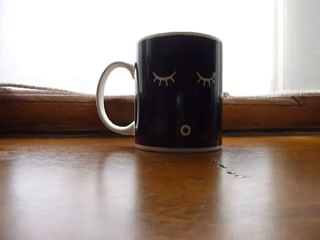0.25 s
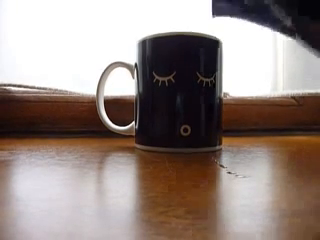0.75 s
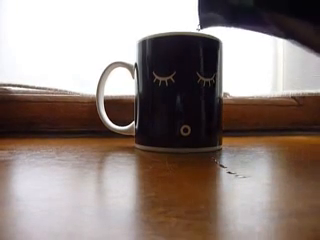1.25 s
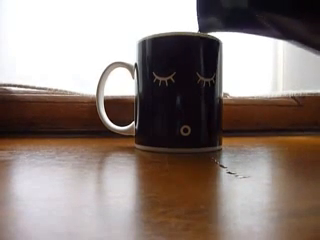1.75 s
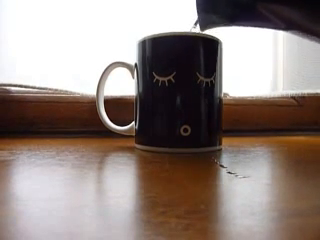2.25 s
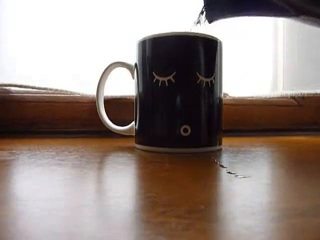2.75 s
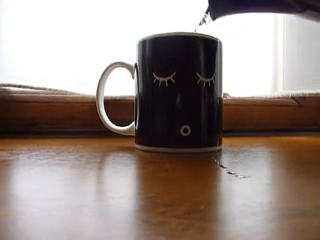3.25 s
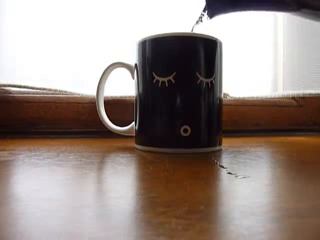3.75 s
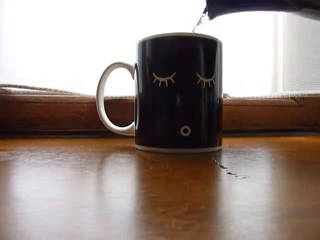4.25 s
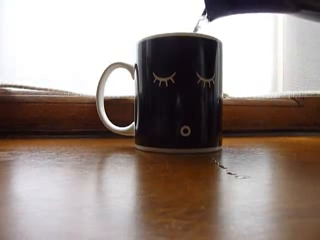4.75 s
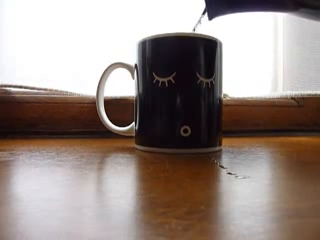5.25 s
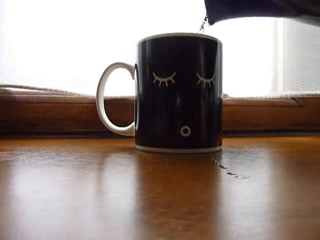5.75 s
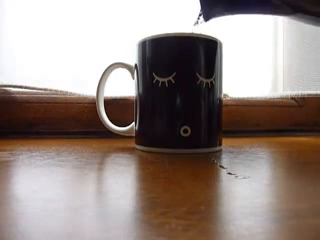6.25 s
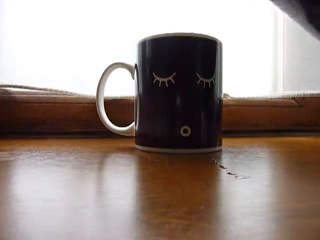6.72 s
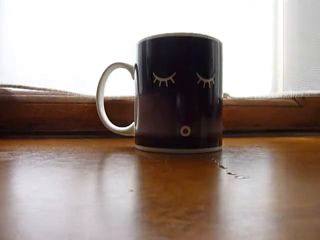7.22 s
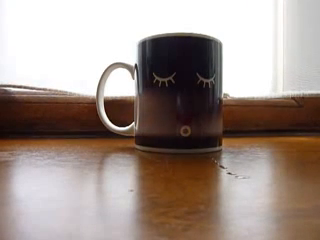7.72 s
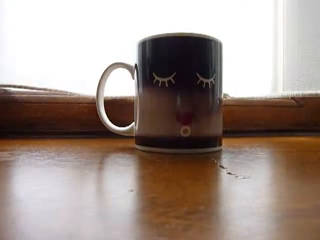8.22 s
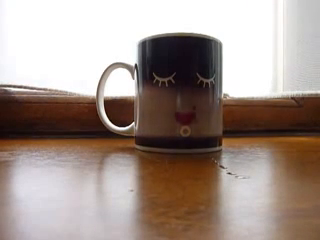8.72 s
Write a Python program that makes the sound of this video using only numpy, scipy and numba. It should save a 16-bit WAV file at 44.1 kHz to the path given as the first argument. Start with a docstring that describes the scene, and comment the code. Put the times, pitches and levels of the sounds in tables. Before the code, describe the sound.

A knock on a wooden table, then water trickles and gurgles into a mug, followed by two thumps of a kettle being set down.

```python
"""In a quiet room a knock rings the modes of a wooden table. A thin stream of hot water then falls from
a kettle into a ceramic mug: drops smack the bottom, then trap ringing bubbles, and the stream gurgles as
the shortening air column rises in pitch. The pour dies away among ticks of the hot kettle and last drips.
Finally the kettle is set down on the table, bounces, slides and thumps again."""
import sys
import numpy as np
from scipy import signal
from scipy.fft import rfft, irfft, next_fast_len
from scipy.io import wavfile
from scipy.ndimage import uniform_filter1d, map_coordinates
from numba import njit

SR = 44100
rng = np.random.default_rng(int(sys.argv[2]) if len(sys.argv) > 2 else 0)


def bounce(signal):
    """Save signal as a 16-bit WAV file at the path given by the first command-line argument."""
    frames = np.transpose(np.atleast_2d(signal))
    limited = np.clip(frames, -1, 1)
    pcm = np.round(limited * 32767).astype(np.int16)
    wavfile.write(sys.argv[1], SR, pcm)


N = 396018
TIME = np.arange(N) / SR

# Room murmur and hiss: f/Hz, relative spectral level/dB
ROOM_SPECTRUM = [(12, -50.5), (20, -7.5), (44, -8.5), (86, -9.5), (123, 0.5), (146, -4.5), (454, -4.5),
                 (583, -6), (714, -3), (1720, -10), (7050, -18), (8200, -24), (10700, -58), (18000, -120)]
# Ticks of the hot kettle and last drips: t/s, level/dB, centre f/Hz
TICK_EVENTS = [(2.172, -46.5, 344), (4.68, -55.5, 398), (4.9, -49.5, 2180), (5.057, -45, 2240),
               (5.13, -51.5, 2370), (5.152, -44.5, 1880), (5.655, -40, 2100), (6.207, -49.5, 2480),
               (6.57, -49.5, 1960), (6.852, -49, 4370), (6.942, -42.5, 6140), (7.459, -42.5, 2520),
               (8.301, -40.5, 3170)]
# Blows on the table: t/s, level/dB, contact time/ms
TABLE_BLOWS = [(0.829, -61, 0.2), (0.9929, -12.5, 0.34), (1.622, -59, 0.29), (7.765, -13.5, 0.15),
               (7.7681, -13.5, 0.32), (7.831, -23, 0.22), (7.841, -34, 0.089), (7.886, -28.5, 0.3),
               (7.893, -35.5, .13), (7.91, -28.5, 0.6), (8.252, -47.5, 0.32), (8.288, -47.5, 0.23),
               (8.398, -39, 0.53), (8.409, -23.5, 0.32), (8.42, -21.5, 0.24), (8.425, -23, 0.38),
               (8.435, -24, 0.28)]
# Modes of the table top: f/Hz, level/dB, t60/s
WOOD_MODES = [(122.8, -11, .16), (175.7, -6, 0.2), (226.4, -6, 0.16), (319.1, 2, 0.041), (415, -1.5, 0.1),
              (466.2, -3.5, 0.13), (530, -12.5, .12), (597, -9, 0.12), (738.8, -12, .13), (870, -17, 0.16),
              (1080, -12.5, 0.073), (1290, -4, 0.044), (1400, -11, 0.08)]
# Dense upper modes of table and room: f/Hz, unstretched t60/s
DIFFUSE_DECAY = [(300, 0.27), (1000, 0.11), (3000, 0.15), (8000, 0.048)]
# Kettle rubbing on wood: f/Hz, relative spectral level/dB
FRICTION_SPECTRUM = [(71, -49), (120, -5.5), (335, -12), (438, -7), (658, -12), (2440, -26), (8300, -48.5),
                     (10800, -66), (18300, -120)]
# Slides of the kettle: t/s, level/dB, rise/s, hold/s, fall/(dB/s)
KETTLE_SLIDES = [(7.904, -50.5, .02, .03, 131), (7.971, -48, 0.034, 0.081, 125),
                 (8.386, -26.5, 0.039, 0.0024, 380), (8.484, -53.5, 0.014, 0.026, 204)]
# Drops that smack the mug: t/s, level/dB, centre f/Hz
DROP_SMACKS = [(1.925, -36.5, 5350), (1.9336, -39.5, 5230), (1.98, -44, 6760), (2.0005, -42, 7070),
               (2.173, -36, 4770), (2.397, -37.5, 6160), (2.4899, -40.5, 3500), (2.371, -48, 7030),
               (2.5004, -46, 5350), (2.5503, -36.5, 6400), (2.6645, -40.5, 7010), (2.8, -39, 6500),
               (3.11, -45.5, 7100), (3.23, -36, 3500), (3.2375, -40, 3420), (3.286, -42, 3200),
               (3.4109, -31.5, 2940), (3.929, -41, 3250), (4.0126, -44.5, 3900), (4.215, -49.5, 6430),
               (4.278, -46.5, 6500)]
# Drops that ring the wall, lower when the mug is full: t/s, level/dB, f/Hz
WALL_PINGS = [(3.287, -55, 2611), (3.414, -48, 2611), (7.018, -61, 2000)]
# Modes of the mug wall: frequency ratio, level/dB, t60/s
WALL_MODES = [(1, 0, .25), (1.011, -9, .1), (1.264, 6, .03)]
# Drops that trap a bubble: t/s, level/dB, f/Hz
BUBBLE_DROPS = [(2.861, -48.5, 1460), (2.932, -42, 1050), (3.025, -40.5, 1055), (3.13, -40, 1050),
                (3.23, -38.5, 1100), (3.246, -33, 1094), (3.255, -36, 1070), (3.279, -24, 1129),
                (3.303, -36, 1080), (3.36, -29.5, 1104), (3.4, -24, 1148), (3.411, -28, 1127),
                (3.459, -39, 1130), (3.495, -35.5, 1060), (3.576, -42, 1180), (3.653, -39.5, 1150),
                (3.705, -39.5, 1073), (3.723, -40.5, 1220), (3.769, -43, 1270), (3.795, -41, 1040),
                (3.828, -37.5, 1330), (3.912, -41.5, 1405), (3.929, -40, 1190), (3.946, -40.5, 1213),
                (4.219, -47, 1355), (4.745, -46.5, 1346), (4.919, -49.5, 1410), (7.018, -27.5, 1196)]
# Fine mist: t/s, level/dB
MIST_LEVEL = [(2.3, -78.5), (2.6, -67.5), (3.25, -65.5), (3.6, -71.5), (3.95, -82), (4.03, -66.5),
              (4.34, -82.5), (5.3, -79)]
# Squirts through an air pocket: t/s, level/dB, hold/s, lowest f/Hz
POCKET_SQUIRTS = [(2.66, -58.5, 0.015, 2580), (2.83, -64, 0.15, 2890), (2.99, -53.5, 0.1, 1675),
                  (3.23, -56.5, 0.035, 2410), (4.006, -60.5, 0.053, 2640)]
# Strength of the stream: t/s, level/dB
STREAM_LEVEL = [(2.3, -75), (2.9, -65), (3.05, -60), (3.21, -65), (3.25, -50), (3.385, -56), (3.42, -54.5),
                (3.56, -57), (3.62, -69), (3.7, -60), (3.96, -55.5), (4.02, -67), (4.34, -72), (4.62, -79),
                (4.75, -66.5), (4.83, -81), (4.93, -65), (5.2, -88)]
# Air column of the filling mug: t/s, f/Hz
COLUMN_PITCH = [(1.5, 805), (2.9, 1033), (3.6, 1112), (3.9, 1288), (4.3, 1480), (5.4, 1450)]


def amp(db):
    """Amplitude ratio of a level in dB."""
    return 10 ** (np.asarray(db) / 20)


def unit(x):
    """x scaled to rms 1."""
    return x / np.sqrt(np.mean(x ** 2) + 1e-20)


def along(points, hz):
    """Interpolation of (f, value) points on a log frequency axis."""
    f, values = np.transpose(points)
    return np.interp(np.log(hz + 1), np.log(f + 1), values)


def envelope(rows):
    """Gain through (t, level) points, silent outside their span."""
    times, db = np.transpose(rows)
    edge = np.clip(np.minimum(TIME - times[0], times[-1] - TIME) / 0.011, 0, 1)
    return edge * amp(np.interp(TIME, times, db))


def swell(start, db, rise_s, hold_s, fall_db_per_s):
    """Gain with a quadratic rise, a hold and an exponential decay."""
    t = TIME - start
    return np.clip(t / rise_s, 0, 1) ** 2 * amp(db - fall_db_per_s * np.maximum(t - rise_s - hold_s, 0))


def wobble(knots_per_s):
    """A smooth curve through random knots."""
    knots = rng.standard_normal(int(N * knots_per_s / SR) + 4)
    return map_coordinates(knots, [TIME * knots_per_s])


def add(track, start, sound):
    """Superpose a sound on the track at a time in seconds."""
    part = track[round(start * SR):][:len(sound)]
    part += sound[:len(part)]


def filtered(x, response):
    """Linear filtering: the spectrum of x times a frequency response."""
    size = next_fast_len(len(x) + SR // 2)
    return irfft(rfft(x, size) * response(np.fft.rfftfreq(size, 1 / SR)), size)[:len(x)]


def resonance(hz, width_hz):
    """Frequency response of a damped oscillator."""
    return lambda f: 1j * f * width_hz / (hz * hz - f * f + 1j * f * width_hz)


@njit
def gliding(x, hz, radius):
    """A two-pole resonator with time-varying pitch and damping."""
    y = np.zeros(len(x))
    for i in range(2, len(x)):
        feedback = 2 * radius[i] * np.cos(2 * np.pi * hz[i] / SR) * y[i - 1] - radius[i] ** 2 * y[i - 2]
        y[i] = (1 - radius[i]) * (x[i] - x[i - 2]) + feedback
    return y


def cavity(x, hz, t60_at_1khz, stages=1):
    """Cavity resonance with radiation damping: a shorter cavity loses its energy faster."""
    radius = amp(-60 * (hz / 1000) ** 2 / t60_at_1khz / SR)
    for _ in range(stages):
        x = gliding(x, hz, radius)
    return x


def ring(modes, t, scatter_db):
    """Free vibration: damped modes of randomly scattered strength, neighbours in opposite phase."""
    out = np.zeros(len(t))
    for k, (hz, db, t60) in enumerate(modes):
        decay = amp(db + scatter_db * rng.standard_normal() - 60 * t / t60)
        out += (-1) ** k * decay * np.sin(2 * np.pi * hz * t)
    return out


def burst(hz, q, t60, t):
    """Exponentially decaying band noise, peak 1."""
    noise = rng.standard_normal(len(t)) * amp(-60 * t / t60)
    band = filtered(noise, lambda f: resonance(hz, hz / q)(f) ** 2)
    return band / np.abs(band).max()


def spatter(per_s, spread_db):
    """Shot noise: random impulses of unequal size, rms 1."""
    arrival, polarity, size = rng.random((3, N))
    return unit((arrival < per_s / SR) * np.sign(polarity - 0.5) * amp(-spread_db * np.log(size + 0.052)))


def diffuse(t, stretch):
    """Overlapping modes merge into noise in which each frequency decays at its own rate."""
    hz, when, spectrum = signal.stft(rng.standard_normal(len(t)), SR, nperseg=256)
    t60 = stretch * along(DIFFUSE_DECAY, hz)[:, None]
    return signal.istft(spectrum * amp(-60 * when / t60), SR, nperseg=256)[1][:len(t)]


def room():
    """Ambient noise: murmur and hiss, slightly patchy in time and frequency."""
    spectrum = signal.stft(rng.standard_normal(N), nperseg=512)[2]
    patches = uniform_filter1d(uniform_filter1d(rng.standard_normal(spectrum.shape), 6, 0), 12, 1)
    noise = signal.istft(spectrum * amp(1.2 * unit(patches)), nperseg=512)[1][:N]
    return amp(-65) * unit(filtered(noise, lambda f: amp(along(ROOM_SPECTRUM, f))))


def ticks():
    """Brief transients have broad spectra: the hot kettle and drips click, each with a wash behind."""
    out, t = np.zeros(N), np.arange(SR // 5) / SR
    for start, db, hz in TICK_EVENTS:
        click = burst(hz, q=2, t60=0.02, t=t)
        wash = burst(840, q=0.16, t60=0.12, t=t)
        add(out, start, amp(db) * (click + amp(-8) * wash))
    return out


def table_blows():
    """Impact excitation: a blow dents and rings the wood; a longer contact is deeper and duller."""
    out, t = np.zeros(N), np.arange(SR // 2) / SR
    for start, db, contact_ms in TABLE_BLOWS:
        contact_s = contact_ms / 1000
        cycles = 0.19 * t / contact_s
        dent = amp(17 - 8.6 * cycles) * np.sin(2 * np.pi * cycles)  # the struck spot springs back
        build_up = 1 - np.exp(-t / 0.00317)  # the whole top takes a moment to join in
        modes = ring(WOOD_MODES, t, scatter_db=3.5) * build_up
        reverberation = amp(-13.5) * filtered(diffuse(t, stretch=2.6), resonance(1500, 2500))
        upper_modes = amp(6.5) * diffuse(t, stretch=0.8)
        blow = dent + modes + upper_modes + reverberation
        add(out, start, amp(db) * filtered(blow, lambda f: 1 / (1 + 2j * np.pi * f * contact_s) ** 2))
    cutoff_hz = 108  # the microphone cuts the deep bass of the knocks
    return filtered(out, lambda f: (-f * f / (cutoff_hz ** 2 - f * f + 1.4j * cutoff_hz * f)) ** 3)


def kettle_slides():
    """Sliding friction: rough contact makes noise that the wood colours."""
    grit = spatter(900, spread_db=1.5) + 1.1 * rng.standard_normal(N)
    friction = unit(filtered(grit, lambda f: amp(along(FRICTION_SPECTRUM, f))))
    return friction * sum(swell(*row) for row in KETTLE_SLIDES)


def mist():
    """Shot noise of fine droplets: many tiny impacts merge into a flickering fizz."""
    droplets = spatter(200, spread_db=4.5) + 0.59 * rng.standard_normal(N)
    fizz = filtered(droplets, lambda f: resonance(6000, 4000)(f) ** 2 + amp(3) * resonance(7000, 250)(f))
    return envelope(MIST_LEVEL) * amp(2.7 * wobble(24.93)) * unit(fizz)


def squirts():
    """Cavity resonance: the stream squirts through an air pocket, whose pitch dips and returns."""
    rest_hz = 2880
    gain, dip_hz = np.zeros(N), np.zeros(N)
    for start, db, hold_s, lowest_hz in POCKET_SQUIRTS:
        gain += swell(start, db, rise_s=0.019, hold_s=hold_s, fall_db_per_s=150)
        progress = np.clip((TIME - start + 0.03) / (hold_s + 0.15), 0, 1)
        dip_hz += (rest_hz - lowest_hz) * np.sin(np.pi * progress)
    return gain * unit(cavity(spatter(450, spread_db=-3), rest_hz - dip_hz, 0.014, stages=2))


def drop_impacts():
    """Impact noise: drops smack the mug, and a few excite the modes of its wall."""
    out, t = np.zeros(N), np.arange(SR // 4) / SR
    for start, db, hz in DROP_SMACKS:
        smack = burst(hz, q=1.85, t60=0.011, t=t)
        tail = burst(hz, q=0.77, t60=0.12, t=t)
        add(out, start, amp(db) * (smack + amp(-8) * tail))
    for start, db, hz in WALL_PINGS:
        modes = np.multiply(WALL_MODES, [hz, 1, 1])
        add(out, start, amp(db) * ring(modes, t, scatter_db=2.5))
    return out


def bubbles(column_hz):
    """Air trapped by a drop rings as a damped oscillator; during the pour the drop kicks the column."""
    out, kicks, t = np.zeros(N), np.zeros(N), np.arange(SR // 4) / SR
    onset = 1 - np.exp(-t / 0.00062)
    decay = amp(-60 * t / 0.017) + amp(-22.5 - 60 * t / 0.11)
    for start, db, hz in BUBBLE_DROPS:
        bubble = amp(2) * onset * decay * np.sin(2 * np.pi * hz * t)
        splash = amp(-15) * burst(hz, q=1.6, t60=0.04, t=t)
        add(out, start, amp(db) * (bubble + splash))
        add(kicks, start, amp(db) * np.hanning(12))
    pouring = TIME < STREAM_LEVEL[-1][0]
    return out + amp(22) * cavity(kicks * pouring, column_hz, 0.16)


def churn():
    """Random forcing of two low resonances: the water churns, louder once the bottom is covered."""
    covered_s = 3.2
    gain = amp(-2) * np.clip((TIME - covered_s) / 0.033, 0.3, 1)
    forcing = spatter(150, spread_db=2.5)
    hollow = filtered(forcing, lambda f: resonance(340, 200)(f) ** 2 + amp(1) * resonance(680, 220)(f) ** 2)
    return gain * unit(hollow)


def gurgle(column_hz):
    """Forced resonance: the broken stream drives the mug's air column and its cross mode."""
    splash = spatter(110, spread_db=3.5) + 0.1 * rng.standard_normal(N)
    column = unit(cavity(splash, column_hz, 0.015, stages=2))
    cross_mode = unit(filtered(splash, lambda f: resonance(3400, 450)(f) ** 2))
    return column + amp(-10.5) * cross_mode


def pour():
    """Rising water shortens the air column; uneven clumps in the stream modulate gurgle and churn."""
    column_hz = np.interp(TIME, *np.transpose(COLUMN_PITCH))
    flow = envelope(STREAM_LEVEL) * amp(2 * wobble(knots_per_s=25))
    drops = bubbles(column_hz) + drop_impacts()
    stream = flow * (gurgle(column_hz) + churn())
    return drops + stream + squirts() + mist()


def scene():
    """Superposition of all sources in one channel."""
    return (room() + table_blows() + kettle_slides() + pour() + ticks())[None]


def record(dry):
    """Band limiting: the microphone opens after a short silence and rolls off the high treble."""
    open_s, rolloff_hz, limit_hz = 0.6175, 8000, 8400
    opened = dry[0] * np.clip((TIME - open_s) / 0.014, 0, 1)
    return filtered(opened, lambda f: (f < limit_hz) / (1 + (f / rolloff_hz) ** 24))[None]


dry = scene()
out = record(dry)
bounce(out)
```